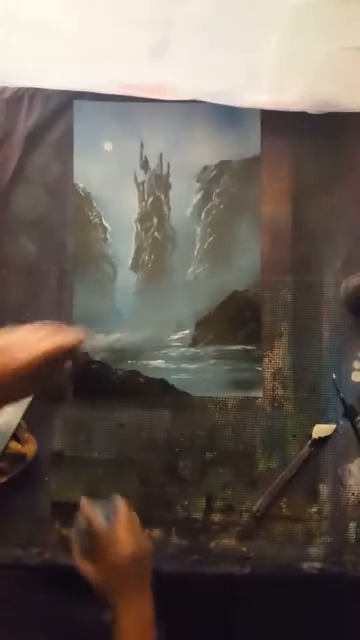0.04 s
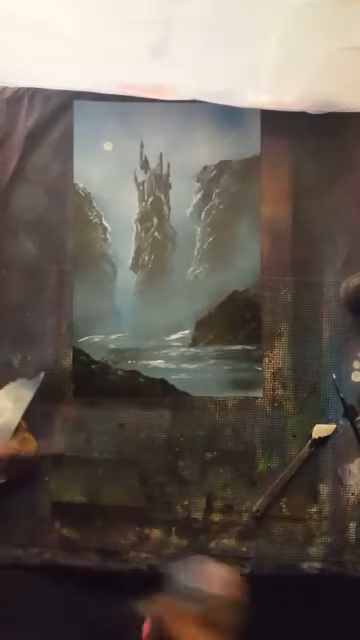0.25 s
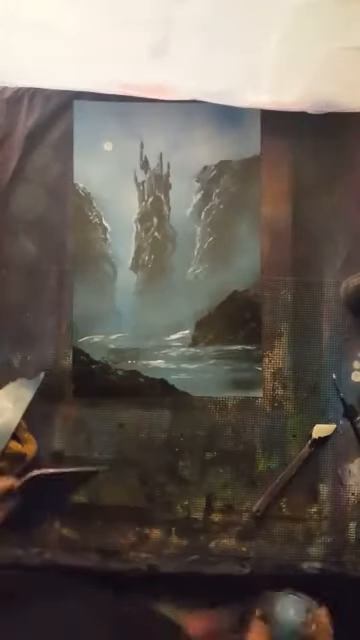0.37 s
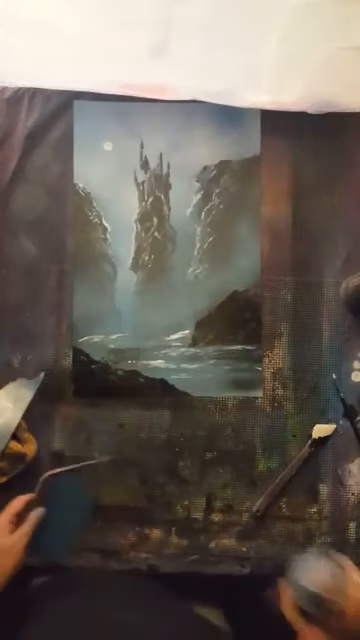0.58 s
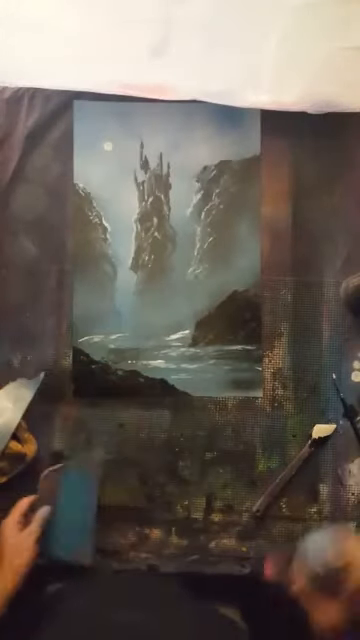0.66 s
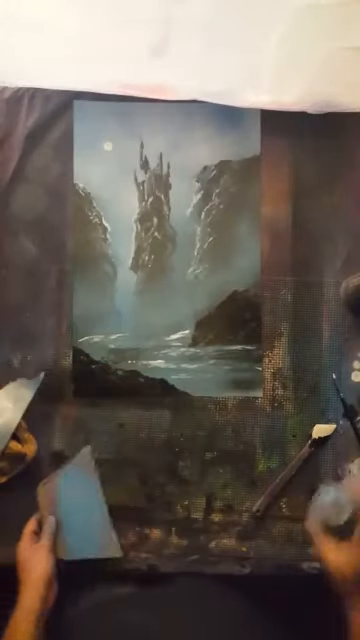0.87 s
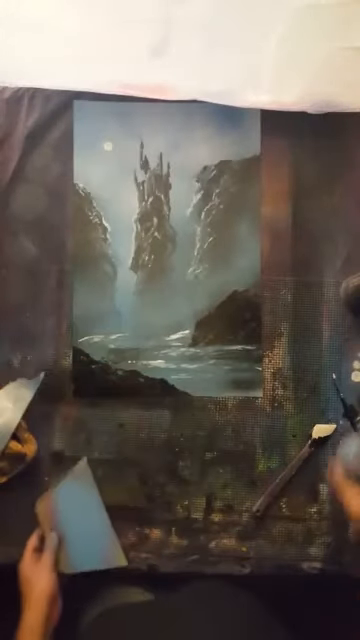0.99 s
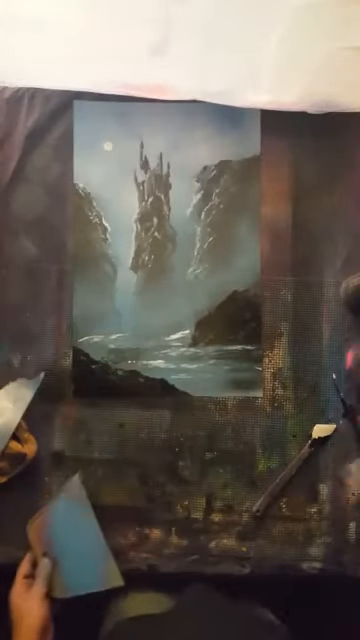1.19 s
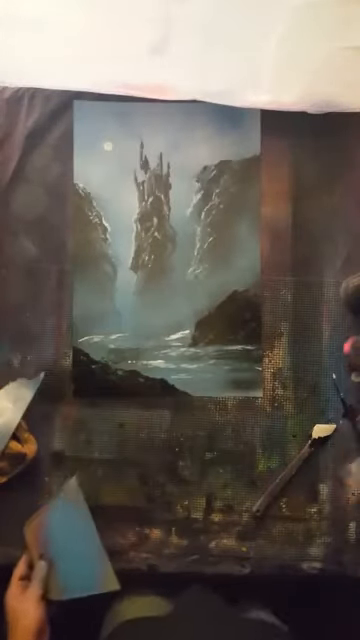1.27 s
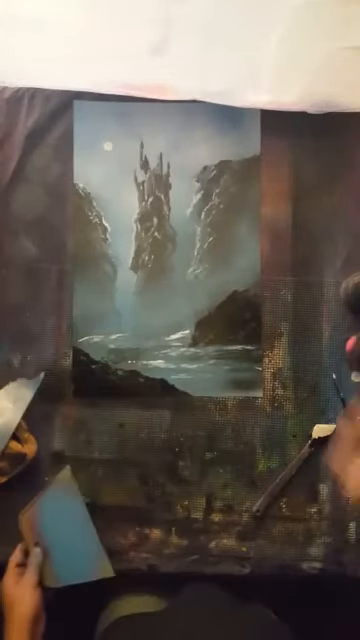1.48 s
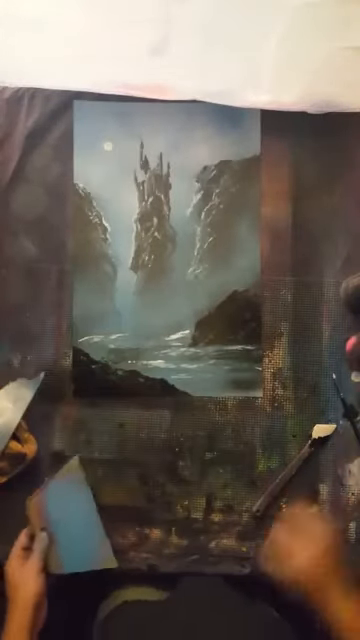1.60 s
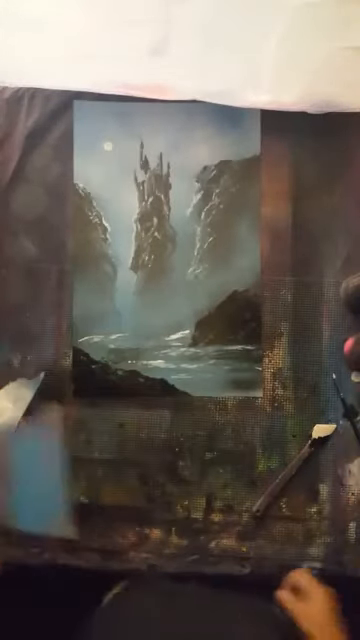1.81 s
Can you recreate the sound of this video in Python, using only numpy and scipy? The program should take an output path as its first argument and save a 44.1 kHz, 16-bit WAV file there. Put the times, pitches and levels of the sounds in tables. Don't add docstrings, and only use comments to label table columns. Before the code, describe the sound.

A spray paint can is shaken, its steel ball rattling brightly, then set down with a thud

```python
import sys
import numpy as np
from scipy import signal
from scipy.fft import rfft, irfft, next_fast_len
from scipy.io import wavfile
from scipy.ndimage import uniform_filter1d

SR = 44100
rng = np.random.default_rng(int(sys.argv[2]) if len(sys.argv) > 2 else 0)


def nominal_scale(level):
    x = np.asarray(level, float) / 20
    return 10 ** x


def output_pcm(signal):
    pcm = np.clip(np.atleast_2d(signal).T, -1, 1) * 32767
    wavfile.write(sys.argv[1], SR, np.round(pcm).astype(np.int16))


N = 81585
LONGEST_T60_S = 0.065


def rms_one(x):
    return x / np.sqrt(np.mean(x ** 2) + 1e-20)


def train(s, heights):
    return np.bincount((np.ravel(s) * SR).astype(int), np.ravel(heights), N)[:N]


def fade(clicks, t60_s):
    return signal.lfilter([1], [1, -nominal_scale(-60 / (t60_s * SR))], clicks + 1e-18)


def ring(clicks, hz, t60_s):
    r = nominal_scale(-60 / (t60_s * SR))
    w = 2 * np.pi * hz / SR
    return signal.lfilter([0, np.sin(w)], [1, -2 * r * np.cos(w), r * r], clicks + 1e-18)


def high(x, hz):
    return signal.sosfilt(signal.butter(2, hz, "high", fs=SR, output="sos"), x)


def coloured(spectrum):
    hz, db = np.transpose(spectrum)
    log_hz = np.log(np.maximum(np.fft.rfftfreq(N, 1 / SR), 1))
    gain_db = np.interp(log_hz, np.log(hz), db, left=-90, right=-90)
    return rms_one(irfft(rfft(rng.standard_normal(N)) * nominal_scale(gain_db), N))


# frequency in Hz, level in dB per Hz.
HUSH_SPECTRUM = [(15, -47), (25, 6), (187, -3.5), (485, -3), (684, -4), (940, -15), (1050, -8.5),
                 (1160, -9.5), (14000, -26)]
HUSH_DB = -61


def hush():
    return nominal_scale(HUSH_DB) * coloured(HUSH_SPECTRUM)


ROOM_T60_S, WALL_CUT_HZ, ROOM_DB = 0.2, 4200, -18


def room(x):
    size = next_fast_len(N + SR)
    z = np.exp(-2j * np.pi * np.fft.rfftfreq(size))
    dull = np.exp(-2 * np.pi * WALL_CUT_HZ / SR)
    wall = (1 - dull) / (1 - dull * z)
    response = 0
    for k, lag in enumerate((rng.uniform(0.0045, 0.033, 10) * SR).astype(int)):
        loop = nominal_scale(-60 * lag / SR / ROOM_T60_S) * wall * z ** lag
        response = response + (-1) ** k * loop / (1 - loop)
    return nominal_scale(ROOM_DB) * irfft(rfft(x, size) * response, size)[:N]


# frequency in Hz, level in dB, t60 in seconds.
HOLLOW_MODES = [(368, -8, 0.047), (627, 0.5, 0.036), (828, -6, 0.026), (982, -1.5, 0.019),
                (1700, -2, 0.0058), (3150, -9, 0.0059)]
# start in seconds, level in dB.
KNOCKS = [
    (1.547, -36),
    (1.579, -60),
]
KNOCK_SWELL_S, SCUFF_DB, KNOCK_LOW_HZ = 0.025, -14, 292


def knocks():
    s, db = np.transpose(KNOCKS)
    starts = train(s, nominal_scale(db))
    bump = np.hanning(int(KNOCK_SWELL_S * SR))
    t = np.arange(len(bump)) / SR
    scuff = nominal_scale(SCUFF_DB) * np.convolve(starts, bump)[:N] * rng.standard_normal(N) * 0.23
    out = np.zeros(N)
    for hz, mode_db, t60_s in HOLLOW_MODES:
        burst = bump * np.sin(2 * np.pi * hz * t) * 2 / bump.sum()
        drive = scuff + np.convolve(starts, burst)[:N]
        out += nominal_scale(mode_db) * ring(drive, hz, min(t60_s, LONGEST_T60_S))
    return high(out, KNOCK_LOW_HZ)


# frequency in Hz, level in dB, t60 in seconds.
TABLE_MODES = [(126, -46, 0.075), (201, -32, 0.046), (343, -32.5, 0.04), (878, -22, 0.01),
               (1740, -30, .015)]
# start in seconds, level in dB.
TOUCHES = [
    (1.1225, -1.5),
    (1.16, -13),
]
THUD_SOFT_S, TABLE_LOW_HZ = 0.0013, 93.5


def thud():
    s, db = np.transpose(TOUCHES)
    soft = np.hanning(int(THUD_SOFT_S * SR) + 3)
    push = np.convolve(train(s, nominal_scale(db)), soft / soft.sum())[:N]
    out = sum(nominal_scale(mode_db) * ring(push, hz, t60_s) for hz, mode_db, t60_s in TABLE_MODES)
    return high(out, TABLE_LOW_HZ)


# time in seconds, level in dB.
ROLL = [(0.0, -85), (0.164, -54), (0.21, -52), (0.376, -49), (0.415, -43), (0.488, -39), (0.85, -57),
        (1.046, -96), (1.246, -100), (1.462, -66), (1.582, -60.5), (1.85, -76)]


def roll_push():
    s, db = np.transpose(ROLL)
    return nominal_scale(np.interp(np.arange(N) / SR, s, db))


GRAINS_PER_S, GRAIN_SPREAD_DB = 400, 3.6


def roll_grains(count):
    present = rng.random((count, N)) < GRAINS_PER_S / SR
    heights = nominal_scale(GRAIN_SPREAD_DB * np.minimum(rng.exponential(1, (count, N)), 4))
    return present * heights * rng.choice([-1, 1], (count, N))


# frequency in Hz, level in dB per Hz.
CRACK_SPECTRUM = [(2650, -5), (4500, -8.5), (5090, -8), (7240, -14.5), (8790, -12), (10100, -14),
                  (13300, -14), (14000, -46)]
CRACK_EDGES_HZ = [3000, 5600, 7400, 9600, 12000, 16000]
# start in seconds, level in dB.
CRACKS = [(0.1487, -54), (0.2465, -33.5), (0.2857, -29), (0.3049, -42), (0.326, -36), (0.3385, -42.5),
          (0.3566, -31.5), (0.3736, -49.5), (0.3924, -45.5), (0.4024, -42.5), (0.4672, -30), (0.526, -40),
          (0.5795, -35.5), (0.7048, -31), (0.811, -37.5), (0.8305, -49), (0.8726, -48.5), (0.9361, -47),
          (0.9896, -45), (1.0046, -50.5), (1.0177, -51.5), (1.058, -50.5), (1.0901, -47), (1.119, -49),
          (1.1275, -38), (1.1624, -58), (1.2383, -35), (1.2854, -50), (1.2964, -58), (1.3337, -48),
          (1.3508, -48), (1.363, -51), (1.4, -52.5), (1.4404, -56)]
CRACK_DB, CRACK_T60_S, CRACK_SCATTER_DB = -4, 0.15, 1.5
TICK_DB, TICK_T60_S = 0.5, 0.015
CLUMP_DB, ROLL_HISS_DB = 0.5, -19.5


def cracks(push):
    s, db = np.transpose(CRACKS)
    clumps = nominal_scale(CLUMP_DB * rms_one(uniform_filter1d(rng.standard_normal(N), size=60)))
    hiss = rms_one(clumps * coloured(CRACK_SPECTRUM))
    tint_db = CRACK_SCATTER_DB * rng.standard_normal((len(s), 5))
    out = np.zeros(N)
    for k, edges in enumerate(zip(CRACK_EDGES_HZ, CRACK_EDGES_HZ[1:])):
        starts = train(s, nominal_scale(db + CRACK_DB + tint_db[:, k]))
        crack = fade(starts, CRACK_T60_S) + nominal_scale(TICK_DB) * fade(starts, TICK_T60_S)
        band = signal.sosfilt(signal.butter(2, edges, "band", fs=SR, output="sos"), hiss)
        out += (crack + push * nominal_scale(ROLL_HISS_DB)) * band
    return out


SWELL_T60_S = 0.0021


def swell(clicks, hz):
    return 2 * (1 - nominal_scale(-60 / (SWELL_T60_S * SR))) * ring(clicks, hz, SWELL_T60_S)


PAIR_SPLIT, EDGE_SHARE = 0.003, 0.32
SHUDDER_DB, SHUDDER_T60_S = -32, 0.076


def shell(modes, when, hit_db, scatter_db, near_hz, octaves, depth_db, grains, push):
    out, rolling = np.zeros(N), np.zeros(N)
    for k, (hz, mode_db, t60_s) in enumerate(modes):
        miss_db = depth_db * (np.exp(-(np.log2(hz / near_hz) / octaves) ** 2) - 1)
        clicks = train(when, (-1) ** k * nominal_scale(hit_db + mode_db + miss_db + scatter_db[:, k]))
        shudder = nominal_scale(SHUDDER_DB) * fade(clicks, SHUDDER_T60_S) * rms_one(grains[k])
        contact = swell(clicks, hz) + EDGE_SHARE * clicks + shudder
        for side in (-1, 1):
            pitch_hz, decay_s = hz * (1 + side * PAIR_SPLIT), min(t60_s, LONGEST_T60_S)
            out += ring(contact, pitch_hz, decay_s)
            rolling += ring(nominal_scale(mode_db) * grains[k], pitch_hz, decay_s)
    return out + push * rms_one(rolling)


# frequency in Hz, level in dB, t60 in seconds.
BASE_MODES = [(370, -13.5, 0.046), (585, -7.5, 0.061), (632, -3, 0.038), (854, -4.5, 0.034)]
WALL_MODES = [(1075, 4.5, 0.011), (1240, 1.5, 0.029), (1630, 5.5, 0.019), (1740, 1.5, 0.022),
              (1900, 1, 0.023), (2050, 9, 0.0083)]
DOME_MODES = [(2280, 1, 0.02), (2624, -1.5, 0.016), (2913, -3.5, 0.024), (3552, -5, 0.018),
              (3768, -11.5, 0.037), (4010, -14.5, 0.056), (4302, -5, 0.017), (4645, -7.5, 0.015)]
# start in seconds, wall level in dB, favoured wall pitch in Hz, base level in dB, dome level in dB.
SQUARE = [(0.4672, -24, 1900, -17, -17.5), (0.5262, -16.5, 1183, -23, -23.5),
          (0.5785, -19.5, 1630, -63, -28.5), (0.7046, -25.5, 2050, -19, -18.5),
          (0.810, -39, 1860, -29.5, -29.5), (0.871, -43, 1900, -36.5, -32.5), (0.937, -44, 1990, -41, -37),
          (1.1288, -31, 1900, -35, -30.5), (0.581, -29, 1240, -53, -33), (0.668, -49, 2050, -39, -48.5),
          (0.445, -38, 2050, -68, -52), (1.2396, -39, 1680, -33, -29.5), (1.334, -41, 1740, -41, -38),
          (1.351, -35, 1740, -38, -43.5), (1.3635, -40.5, 1740, -44, -32.5), (1.401, -39, 1740, -51, -35.5),
          (1.4405, -50, 1750, -49, -46), (1.735, -50.5, 1540, -55, -55.5), (1.8288, -57, 1290, -61, -55.5)]
GLANCING = [(0.1, -62, 1890, -79, -59), (0.1359, -45.5, 1330, -77, -49.5), (0.149, -38, 1950, -78, -52),
            (0.2437, -25, 1040, -37.5, -34), (0.249, -29, 1700, -36.5, -35), (0.2585, -36, 1075, -44, -55),
            (0.2846, -26, 1850, -27, -28), (0.306, -50, 1900, -47, -47), (0.3253, -15.5, 1900, -35, -29.5),
            (0.329, -25.5, 1900, -59, -56), (0.3374, -37, 1990, -44, -34), (0.3573, -39, 2050, -32.5, -27),
            (0.3916, -27, 1660, -44, -36), (0.4, -38, 1640, -42.5, -34.5), (0.832, -39, 1670, -66, -51),
            (0.9885, -46, 2010, -43.5, -40), (1.003, -42, 1904, -44, -43),
            (1.0185, -43, 2020, -48.5, -46.5), (1.057, -45, 1846, -51, -51),
            (1.0883, -38, 1740, -43.5, -41), (1.139, -42, 1740, -45, -56), (1.242, -32, 1780, -45.5, -39),
            (1.1628, -49, 1740, -67, -51), (1.2172, -42.5, 1687, -74, -49), (1.2852, -40, 1700, -34, -40),
            (1.2965, -46, 1740, -74, -41), (1.320, -52, 1740, -51, -48), (1.632, -69, 1900, -58, -55.5)]
BRUSH = [
    (1.118, -46, 1700, -54, -52),
]
# time in seconds, favoured base pitch in Hz, favoured dome pitch in Hz.
LANDING = [(0, 640, 2900), (.24, 630, 3700), (.28, 620, 3700), (.32, 730, 2850), (.35, 824, 3720),
           (.39, 630, 2240), (.46, 740, 4290), (.52, 740, 2240), (.57, 640, 3550), (.70, 780, 4200),
           (.80, 830, 4260), (.98, 845, 3620), (1.0, 840, 2660), (1.08, 840, 3500), (1.21, 845, 2400),
           (1.235, 845, 3800), (1.28, 650, 3720), (1.29, 650, 2900), (1.33, 860, 3550), (1.345, 840, 2650),
           (1.36, 845, 3550), (1.43, 850, 2900), (1.6, 640, 2650)]
BASE_DB, WALL_DB, DOME_DB = -3, -6.5, -5
ROLL_BASE_DB, ROLL_WALL_DB, ROLL_DOME_DB = -6.5, -5.5, -7.5
END_OCTAVES, END_DEPTH_DB = 0.13, 11
WALL_OCTAVES, WALL_DEPTH_DB = 0.075, 17
SCATTER_DB, CAN_LOW_HZ = 2.5, 403


def ball():
    s, wall_db, wall_hz, base_db, dome_db = np.transpose(SQUARE + GLANCING + BRUSH)[:, :, None]
    square = np.arange(len(s))[:, None] < len(SQUARE)
    step = np.arange(5)
    gaps = (step > 0) * rng.uniform(0.35, 1.1, (len(s), 5))
    when = s + np.where(square, 0.0015, 0.002) * np.cumsum(gaps, axis=1)
    loss_db = np.where(square, 9, 4) * step
    row = np.searchsorted(np.transpose(LANDING)[0], s[:, 0]) - 1
    _, base_hz, dome_hz = np.transpose(np.array(LANDING)[row])[:, :, None]
    parts = [(BASE_MODES, base_db + BASE_DB, base_hz, END_OCTAVES, END_DEPTH_DB, ROLL_BASE_DB),
             (WALL_MODES, wall_db + WALL_DB, wall_hz, WALL_OCTAVES, WALL_DEPTH_DB, ROLL_WALL_DB),
             (DOME_MODES, dome_db + DOME_DB, dome_hz, END_OCTAVES, END_DEPTH_DB, ROLL_DOME_DB)]
    count = len(BASE_MODES + WALL_MODES + DOME_MODES)
    push, grains = roll_push(), roll_grains(count)
    scatter_db = SCATTER_DB * rng.standard_normal((len(s), count, 5))
    out, first = np.zeros(N), 0
    for modes, hit_db, near_hz, octaves, depth_db, roll_db in parts:
        out += shell(modes, when, hit_db - loss_db, scatter_db[:, first:], near_hz, octaves, depth_db,
                     grains[first:], push * nominal_scale(roll_db))
        first += len(modes)
    return high(out + cracks(push), CAN_LOW_HZ)


def scene():
    near = ball() + thud() + knocks()
    return (near + room(near) + hush())[None]


def band_limit(x):
    return signal.sosfilt(signal.butter(12, 15040, fs=SR, output="sos"), x)


MIC_LOW_HZ, MIC_HIGH_HZ = 49.4, 13450


def record(dry):
    mix = high(dry, MIC_LOW_HZ)
    mix = signal.sosfilt(signal.butter(8, MIC_HIGH_HZ, fs=SR, output="sos"), mix)
    return band_limit(mix)


dry = scene()
out = record(dry)
output_pcm(out)
```